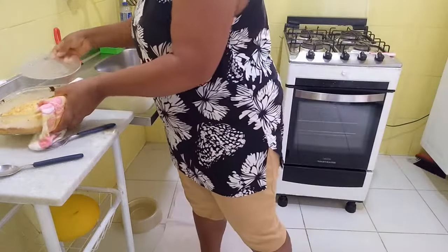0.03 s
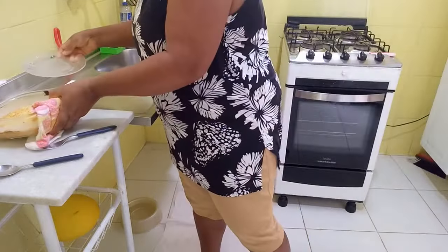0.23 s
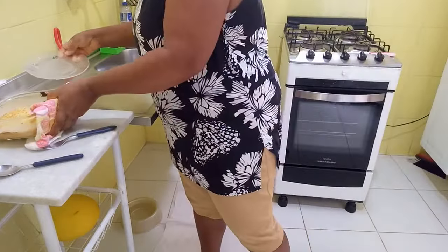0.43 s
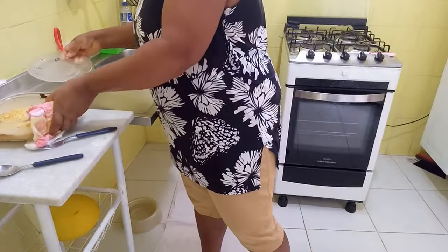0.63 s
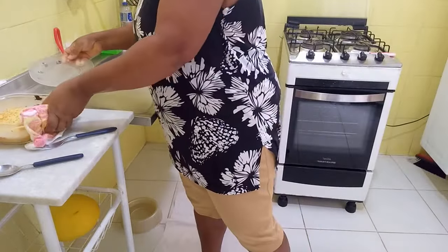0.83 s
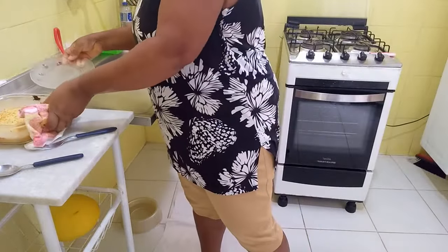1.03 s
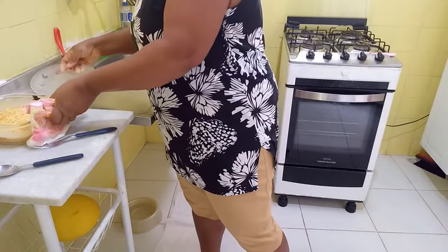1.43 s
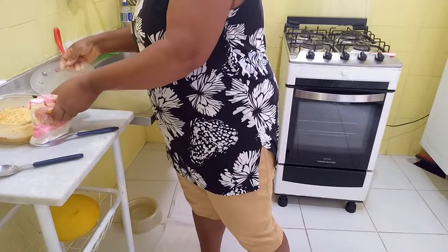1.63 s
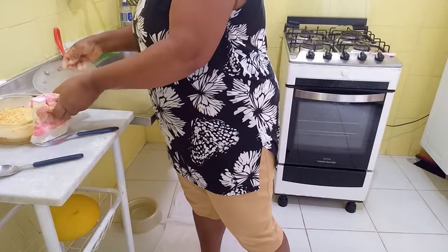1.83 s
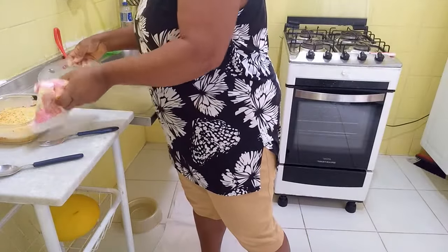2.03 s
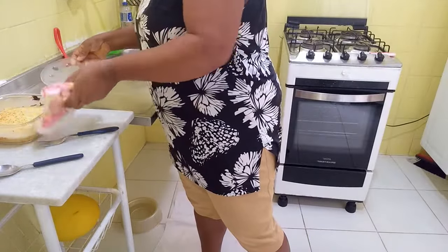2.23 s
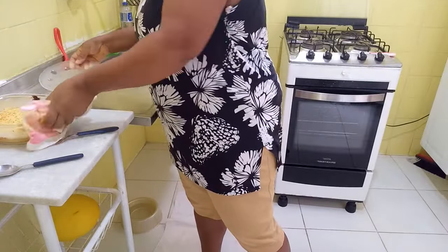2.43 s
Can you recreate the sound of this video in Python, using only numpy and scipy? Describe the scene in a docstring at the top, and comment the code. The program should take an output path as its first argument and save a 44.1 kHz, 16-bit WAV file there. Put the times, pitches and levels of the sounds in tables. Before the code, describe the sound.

A glass dish clanks down on a stone table and rings briefly.

```python
"""Setting down a glass dish

A glass baking dish lands on a stone-topped table in a small tiled kitchen. A few quick taps
make the glass ring and the table thump, and the tiles echo. The dish is then nudged softly
over the top and cloth rustles, while a fridge hums under a faint hiss."""
import sys
import numpy as np
from scipy import signal
from scipy.fft import rfft, irfft
from scipy.io import wavfile
from scipy.ndimage import uniform_filter1d

SR = 44100
rng = np.random.default_rng(int(sys.argv[2]) if len(sys.argv) > 2 else 0)


def to_wav(s):
    """Save 16-bit WAV."""
    ch = np.atleast_2d(s).T  # columns
    pcm = np.round(np.clip(ch, -1, 1) * 32767)  # PCM
    wavfile.write(sys.argv[1], SR, pcm.astype(np.int16))


N = 114660
TIMES, FREQS = np.arange(N) / SR, np.fft.rfftfreq(N, 1 / SR)
SIDES = np.array([[1], [-1]])  # plus for the left ear, minus for the right

# taps of the base as it settles: t/s, relative level/dB, contact time/ms
TAPS = [(0.2368, -8.5, .04), (0.2367, -3.5, 0.029), (0.2399, -2.5, 0.093), (0.255, -8, 0.16),
        (0.2599, -8.5, .25)]
LANDING_S = TAPS[0][0]


def undb(db):
    """Turn decibels into a number to multiply by."""
    return 10 ** (np.asarray(db) / 20)


def over_time(points):
    """Join (t/s, value) points to give a value at every sample."""
    return np.interp(TIMES, *np.array(points).T)


def by_hz(points):
    """Join (f/Hz, value) points to give a value at every frequency."""
    hz, value = np.array(points).T
    return np.interp(np.log(FREQS + 1), np.log(hz), value)


def unit(x):
    """Scale a signal to an average (rms) size of 1."""
    return x / np.sqrt(np.mean(x ** 2))


def wander(rate):
    """A smooth random wobble that picks a new value rate times a second."""
    hold = int(SR / rate)
    steps = np.repeat(rng.standard_normal(N // hold + 1), hold)
    return unit(uniform_filter1d(uniform_filter1d(steps, hold), hold)[:N])


def stereo_noise(alike_hz=650):
    """Spectra of left and right noise, alike in the bass and unrelated higher up."""
    mid, side = rfft(rng.standard_normal((2, N)))
    alike = .97 / (1 + (FREQS / alike_hz) ** 2)
    return mid * np.sqrt(1 + alike) + SIDES * side * np.sqrt(1 - alike)


def flatten(sound, bins):
    """Spectrum of a sound with its broad humps levelled and its fine detail kept."""
    spectrum = rfft(sound)
    power = uniform_filter1d(uniform_filter1d(np.abs(spectrum) ** 2, bins), bins)
    first_half = np.arange(N) < N // 2
    return rfft(irfft(spectrum / np.sqrt(power), N) * first_half)


def tone_filter(db):
    """Spectrum of the quickest filter with this tone that makes no sound before it is hit."""
    cepstrum = irfft(np.log(undb(db)), N)
    cepstrum[1:N // 2] *= 2
    cepstrum[N // 2 + 1:] = 0
    return np.exp(rfft(cepstrum))


def fade(t60):
    """Die away by 60 dB in t60 seconds, the fade time."""
    return np.exp(-np.log(1000) * np.minimum(TIMES / t60, 10))


def swell(centre, length):
    """One smooth rise and fall."""
    return np.cos(np.pi * np.clip((TIMES - centre) / length, -.5, .5))


def room_air():
    """The room rumbles under a faint hiss, a little louder on the left."""
    # tone of the background: f/Hz, relative level/dB
    tone = [(25, -16.5), (45, -9.5), (80, 7.5), (135, -7.5), (200, -3.5), (300, -10), (450, -15),
            (650, -23), (1300, -35), (2700, -34), (4200, -39.5), (5000, -32.5), (7000, -34.5),
            (8100, -27.5), (11000, -37), (15500, -37)]
    # its slow rise and fall: t/s, level change/dB
    changes = [(0, 0.5), (.8, -0.5), (1.3, 0.5), (1.9, 1.5), (2.6, 2)]
    base_db, left_lead_db = -58, 2
    noise = unit(irfft(stereo_noise(alike_hz=700) * undb(by_hz(tone)), N))
    return noise * undb(base_db + over_time(changes) + SIDES * left_lead_db / 2)


def fridge():
    """Mains power makes a wavering hum, heard with a thin whine and a brief low drone."""
    # tones of the hum and whine: f/Hz, base level/dB, left minus right/dB
    tones = [(59.2, -56, 1), (119, -66, 1), (176.8, -63, 1), (354, -74, 0), (414, -64, 1), (532, -84, 0),
             (2840, -91, 6), (5028, -88, 9), (6340, -92, 6), (7450, -88, 8), (7747, -89, 0), (7865, -90, 0),
             (7983, -83, 2), (8043, -81, -2), (10000, -94, 2)]
    # rise and fall of the low hum: t/s, level change/dB
    low_changes = [(0, -5.5), (.7, -0.5), (1.4, -9.5), (1.8, 2), (2.6, 0.5)]
    waver_db, hum_drift_hz, whine_drift_hz = 1, .53, 10
    hum = 0
    for hz, db, pan_db in tones:
        drift = hum_drift_hz * wander(5) if hz < 1000 else whine_drift_hz * wander(43)
        level_db = db + waver_db * wander(4.6) + (over_time(low_changes) if hz < 380 else 0)
        wave = np.sin(2 * np.pi * np.cumsum(hz + drift) / SR)
        hum = hum + undb(level_db + SIDES * pan_db / 2) * wave
    drone_hz, drone_db = 84, -54
    drone = undb(drone_db) * swell(centre=1.17, length=.66) * np.sin(2 * np.pi * drone_hz * TIMES)
    return np.sqrt(2) * (hum + drone)  # turns rms levels into wave heights


def friction(strokes, tone):
    """Rubbing makes an uneven noise that swells with each stroke."""
    noise = unit(irfft(stereo_noise() * undb(by_hz(tone)), N))
    flicker_db = 2.75 * wander(39.97)
    return noise * undb(flicker_db) * sum(undb(db) * swell(s, length) for s, length, db in strokes)


def cloth_rustles():
    """Cloth rubs in a few soft, bright rustles."""
    # rustles: middle t/s, length/s, level/dB
    strokes = [(.02, .14, -76), (.72, 0.21, -67), (.9, 0.16, -75), (1.27, 0.18, -72.5), (2.45, 0.11, -76)]
    # tone of the cloth: f/Hz, relative level/dB
    tone = [(800, -25), (1800, 1), (2900, -5.5), (4000, -6), (5500, -3), (9000, -3), (15000, -7)]
    return friction(strokes, tone)


def ringing_rubs():
    """Each light rub makes the tableware ring faintly around one pitch."""
    # rubs: middle t/s, length/s, f/Hz, width/Hz, level/dB
    rubs = [(0.643, 0.12, 8500, 410, -69), (.65, .11, 10100, 600, -72), (.74, 0.19, 2380, 218, -71.5),
            (0.902, 0.24, 1836, 120, -72), (1.484, 0.2, 3966, 350, -77.5), (1.755, 0.09, 944, 347, -66.5),
            (1.972, 0.4, 2072, 70.5, -80), (2.117, 0.09, 2930, 110, -76.5)]
    noise, sound = stereo_noise(), 0
    for s, length, hz, width, db in rubs:
        band = noise / (1 + (2 * (FREQS - hz) / width) ** 2)
        sound = sound + undb(db) * swell(s, length) * unit(irfft(band, N))
    return sound


def dish_slides():
    """The nudged dish scrapes softly over the stone."""
    # slides: middle t/s, length/s, level/dB
    strokes = [(0.673, 0.27, -57.5), (0.872, 0.19, -57), (0.99, 0.16, -64.5), (1.225, 0.13, -76),
               (1.76, 0.22, -71)]
    # tone of glass on stone: f/Hz, relative level/dB
    tone = [(200, 4), (400, 2.5), (700, -1.5), (950, 6.5), (1200, -1.5), (1450, -10.5), (1900, -11.5),
            (3000, -14), (6000, -22), (10000, -23), (15000, -45)]
    return friction(strokes, tone)


def kitchen_echo():
    """Spectrum of a click in the room: it arrives directly, then bounces off the tiles."""
    # how long the echoes last: f/Hz, fade time/s
    fade_times = [(150, 0.47), (700, 0.39), (1500, 0.4), (3000, .41), (6000, .41), (14000, .37)]
    direct_db, echo_db, build_s = -7, -8, .005
    noise, echoes = stereo_noise(), 0
    for hz, t60 in fade_times:
        band = by_hz([(f, float(f == hz)) for f, _ in fade_times])
        echoes = echoes + irfft(noise * band, N) * fade(t60)
    build_up = 1 - np.exp(-TIMES / build_s)
    return undb(direct_db) + undb(echo_db) * flatten(echoes * build_up, bins=160)


def knocks():
    """Spectrum of the short knocks that the taps send into the room."""
    # tone of a knock: f/Hz, relative level/dB
    tone = [(70, -19), (100, -13.5), (170, -14), (300, -8), (420, -5), (560, -3.5), (720, -1), (950, 2.5),
            (1200, -4), (1400, -13), (1600, 4), (2250, -8), (2550, -1.5), (3200, -6), (3450, -11),
            (4000, -18.5), (5100, -16.5), (6500, -22), (7000, -22.5), (8500, -19), (9300, -23.5),
            (11000, -30.5), (13500, -31.5), (15500, -41)]
    # pitches that ring very briefly in it: f/Hz, width/Hz, boost/dB
    peaks = [(1550, 70, 6), (1725, 70, 5), (1900, 90, 6), (3150, 130, 7), (4620, 170, 13), (5460, 170, 10),
             (5980, 150, 10), (7200, 150, 7), (8040, 130, 6), (9900, 300, 8), (10850, 300, 7),
             (12300, 300, 9), (14050, 400, 7)]
    gain_db, bursts = 25, 0
    for s, db, contact_ms in TAPS:
        delay = np.exp(-2j * np.pi * FREQS * round(s * SR) / SR)
        push = undb(db) / (1 + 1j * FREQS * contact_ms / 1000)  # longer contact sounds duller
        burst = irfft(stereo_noise(), N) * fade(t60=.014)
        bursts = bursts + delay * push * flatten(burst, bins=400)
    in_room = irfft(bursts * kitchen_echo(), N)
    levelled = irfft(flatten(in_room, bins=260), N) * (TIMES >= LANDING_S)
    boost_db = sum(db / (1 + (2 * (FREQS - hz) / width) ** 2) for hz, width, db in peaks)
    return rfft(levelled) * tone_filter(by_hz(tone) + boost_db) * undb(gain_db)


def ring(notes):
    """Spectrum of an object's own notes, struck at the landing; longer ones build more slowly."""
    build_share, fade_speedup, spread_rad = .013, 1.05, 1.1
    age, sound = np.maximum(TIMES - LANDING_S, 0), 0
    for hz, db, t60 in notes:
        ear_shift = spread_rad * min(hz / 1000, 1) * SIDES / 2  # the ears hear it out of step
        phase = rng.uniform(0, 2 * np.pi) + rng.choice([-1, 1]) * ear_shift
        rise = 1 - np.exp(-age / (build_share * t60))
        fall = np.exp(-np.log(1000) * fade_speedup * age / t60)
        sound = sound + undb(db) * rise * fall * np.sin(2 * np.pi * hz * age + phase)
    return rfft(sound)


def dish_landing():
    """The base knocks on the stone; the glass rings high and the table thumps low."""
    # notes of the glass: f/Hz, relative level/dB, base fade time/s
    glass_notes = [(472, -11, .26), (614, -14, .26), (974, -11, .25), (1071, -8, .28), (1217, -15, .25),
                   (1544, -5, .26), (1571, -10, .26), (1716, -5, .24), (1739, -12, .34), (1884, -9, .32),
                   (1923, 0, .24), (3138, -2, .12), (3170, -8, .36), (4600, -1, .04), (4620, -21, .3),
                   (5465, -5, .03)]
    # notes of the table: f/Hz, relative level/dB, base fade time/s
    table_notes = [(93, 0, .26), (128, -5, .18), (172, -5, .28), (250, -4, .27), (290, -3, .25),
                   (372, -1, .22)]
    # which side is louder: f/Hz, left minus right/dB
    balance = [(300, 0), (700, .5), (1000, 0), (1550, -3), (2000, 2), (2700, 6), (3300, 3), (4600, 1),
               (8000, -2), (14000, -1)]
    glass_db, table_db = -18, -29.5
    spectrum = knocks() + undb(glass_db) * ring(glass_notes) + undb(table_db) * ring(table_notes)
    return irfft(spectrum * undb(SIDES * by_hz(balance) / 2), N)


def scene():
    """Add the dish and the cloth to the background of the kitchen."""
    return dish_landing() + dish_slides() + cloth_rustles() + ringing_rubs() + fridge() + room_air()


def record(dry):
    """Round off the loudest peaks and cut the highest treble."""
    ceiling, top_hz = .9, 15750
    rounded = dry / (1 + (dry / ceiling) ** 4) ** .25
    return signal.sosfilt(signal.ellip(10, .2, 80, top_hz, fs=SR, output="sos"), rounded)


dry = scene()
out = record(dry)
to_wav(out)
```